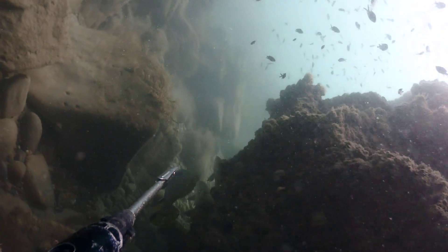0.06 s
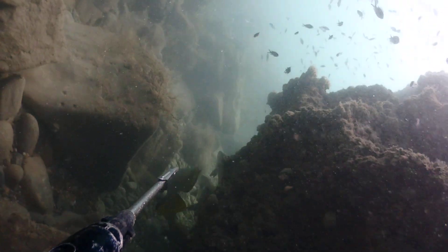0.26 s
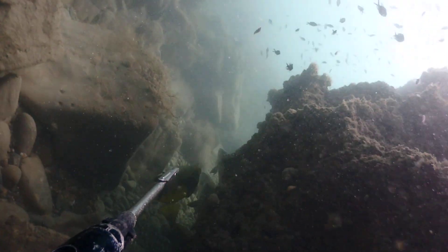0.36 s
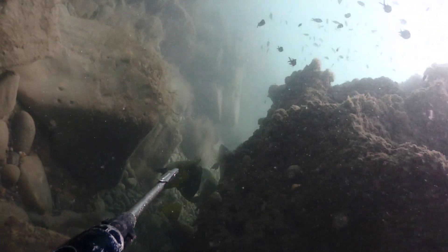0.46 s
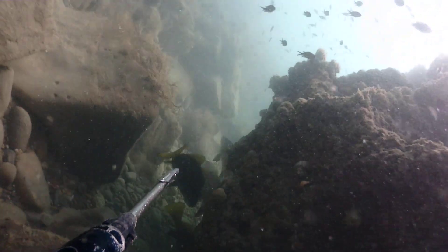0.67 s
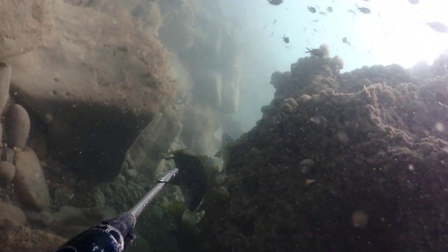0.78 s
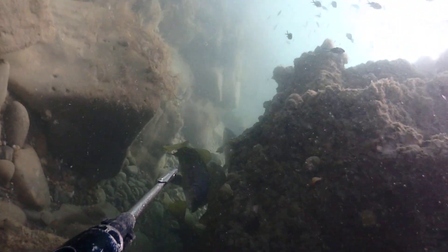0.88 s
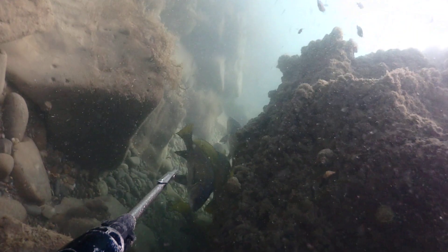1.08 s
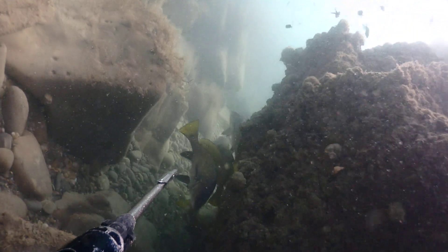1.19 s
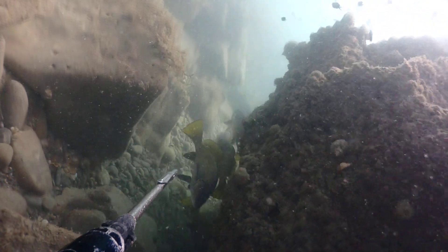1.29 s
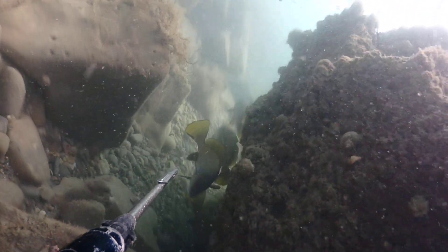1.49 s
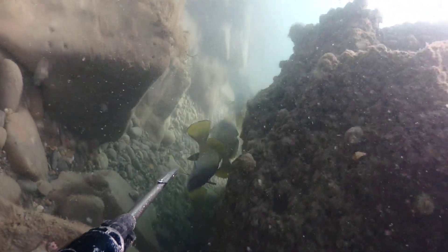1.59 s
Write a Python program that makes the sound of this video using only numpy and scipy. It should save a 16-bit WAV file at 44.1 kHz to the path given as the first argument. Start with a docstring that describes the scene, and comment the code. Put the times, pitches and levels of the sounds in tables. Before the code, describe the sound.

Muffled knocks on a sealed camera case underwater, all short and dry. Snaps at 0.07 s lead to clustered hollow knocks around 0.2 s and a dull bump at 0.33 s. One hard clack hits at 0.57 s, brighter on the left. Bumps resume at 0.82 s; knocks cluster at 1.1-1.3 s, then thin out until 1.65 s. Fine crackle swells and dips over low wash and hiss.

```python
"""Under water among rocks, a camera drifts in a sealed case whose few short modes colour each contact.
Dull bumps, hollow knocks, snaps and thin ticks are short pushes with a rattle that ring those modes.
One hard knock swings the wall of the case; a dense far crackle of random grains and a low wash of
shaped noise lie behind. The right microphone hears the water through a muffled port, and both hiss."""
import sys
import numpy as np
from scipy import signal
from scipy.fft import rfft, irfft
from scipy.io import wavfile

SR = 44100
rng = np.random.default_rng(int(sys.argv[2]) if len(sys.argv) > 2 else 0)


def decibels_to_gain(level_db):
    """Convert a level in decibels to a linear amplitude gain (20 dB per decade)."""
    exponent = np.asarray(level_db, float) / 20
    return 10 ** exponent


def generate_wav(sig):
    """Save sig (samples, or channels by samples) to the path in sys.argv[1] as 16-bit PCM at SR."""
    pcm = np.round(np.clip(np.atleast_2d(sig).T, -1, 1) * 32767).astype(np.int16)
    wavfile.write(sys.argv[1], SR, pcm)


N = 72765  # samples in the scene
TAPS = 4096  # samples in one ring

# Modes of the sealed case: (frequency [Hz], level [dB], t60 [s])
CASE_MODES = [(136.5, -4.5, 0.05), (230, -5, 0.046), (360, -2.5, 0.031), (412.4, 3.5, 0.024),
              (524.5, -3, 0.08), (678, -1.5, 0.034), (736.3, 8.5, 0.025), (950, -11, 0.089),
              (1040, -32, 0.0083), (1372, 5, 0.024), (1610, 4.5, 0.014), (2110, -1.5, 0.024),
              (2978, 3, 0.016), (3597, 5, 0.0067), (4600, -2, 0.015), (5000, -23, 0.023),
              (9500, -29, 0.0058), (12400, -34.5, .003)]


def case_ring(centre_hz, octaves, detune=0.0):
    """Decaying sines of the case, struck once, weighted towards a centre and scaled to peak 1."""
    t = np.arange(TAPS) / SR
    hz, db, t60 = np.transpose(CASE_MODES)[:, :, None]
    # 6 dB weaker at `octaves` away from the centre
    weight_db = db - 6 * (np.log2(hz / centre_hz) / octaves) ** 2
    modes = decibels_to_gain(weight_db - 60 * t / t60) * np.sin(2 * np.pi * hz * (1 + detune) * t)
    build_up_cycles = 1.2  # of the centre frequency
    build_up = np.sin(np.pi / 2 * np.minimum(t * centre_hz / build_up_cycles, 1)) ** 2
    sound = modes.sum(0) * build_up
    return sound / abs(sound).max()


def contacts(rows, octaves, rattle_t60, rattle, gain_db):
    """Each contact is one rounded push and a short noisy rattle, ringing slightly detuned case modes."""
    out = np.zeros(N + 2 * TAPS)
    t = np.arange(1500) / SR  # the rattle stops after 34 ms
    for start_s, db, centre_hz in rows:
        shake = rng.standard_normal(len(t)) * decibels_to_gain(-60 * t / rattle_t60)
        shake = shake / np.linalg.norm(shake)
        tap = t == 0
        rounded = np.hanning(int(0.3 * SR / centre_hz) + 3)  # about 0.3 cycles of the centre
        push = np.convolve(rattle * shake + tap, rounded)
        detune = 0.02 * rng.standard_normal((len(CASE_MODES), 1))
        sound = signal.fftconvolve(push, case_ring(centre_hz, octaves, detune))
        at = round(start_s * SR)
        out[at:at + len(sound)] += decibels_to_gain(db + gain_db) * sound / abs(sound).max()
    return out[:N]


# Dull bumps: (time [s], level before the gain [dB], centre [Hz])
BUMPS = [(.199, -29.5, 400), (.33, -19, 267), (.336, -30.5, 230), (.403, -25, 321), (.415, -36, 266),
         (.477, -39, 300), (.632, -29, 315), (.694, -40, 188), (.823, -20.5, 360), (.829, -26, 310),
         (.873, -32, 336), (.917, -34.5, 273), (.993, -28, 372), (1.146, -21.5, 312), (1.199, -37.5, 232),
         (1.268, -20, 300), (1.276, -28.5, 268), (1.39, -38, 262), (1.501, -39, 141), (1.507, -30.5, 367),
         (1.641, -30, 400)]


def bumps():
    """Low pushes on the case; the faint rattle has a negative t60, so it grows very slightly."""
    return contacts(BUMPS, octaves=0.64, rattle_t60=-5.5, rattle=0.13, gain_db=0.67)


# Hollow knocks: (time [s], level before the gain [dB], centre [Hz])
HOLLOW_KNOCKS = [(.086, -34.5, 547), (.184, -27.5, 740), (.206, -25, 1310), (.22, -21.5, 870),
                 (.231, -36, 1300), (.246, -28, 760), (.345, -22.5, 720), (.404, -26, 680),
                 (.438, -38, 756), (.466, -39, 676), (.689, -32, 780), (.725, -40, 720), (.878, -27.5, 716),
                 (.946, -36, 1100), (.972, -25, 1040), (.992, -33, 750), (1.062, -37, 708),
                 (1.108, -29.5, 760), (1.141, -25, 760), (1.162, -23.5, 740), (1.184, -24.5, 730),
                 (1.204, -31, 705), (1.236, -26, 740), (1.277, -25.5, 710), (1.412, -26, 830),
                 (1.533, -29.5, 763), (1.575, -24.5, 850)]


def knocks():
    """Pushes with a strong rattle that ring a narrow group of middle modes."""
    return contacts(HOLLOW_KNOCKS, octaves=0.4, rattle_t60=0.035, rattle=0.62, gain_db=4.3)


# Small snaps: (time [s], level before the gain [dB], centre [Hz])
SMALL_SNAPS = [(.0688, -22.5, 4300), (.0754, -28, 2970), (.1047, -30, 3200), (.3351, -23.5, 2940),
               (.44, -31, 3800), (.533, -31, 3400), (.6125, -37, 5200), (.6385, -33, 3170),
               (1.018, -31.5, 4950), (1.037, -32.5, 3580), (1.0795, -24.5, 3940), (1.0864, -34, 4600),
               (1.0923, -27, 4000), (1.1683, -37, 3150), (1.5163, -37, 4170), (1.558, -42.5, 4800)]


def snaps():
    """Very short pushes with a rattle that ring a wide group of treble modes."""
    return contacts(SMALL_SNAPS, octaves=0.686, rattle_t60=0.034, rattle=0.6, gain_db=6.1)


# Thin high ticks: (time [s], level before the gain [dB], centre [Hz])
THIN_TICKS = [(0.1098, -38, 9200), (0.2885, -33.5, 10000), (0.6124, -42, 9500), (0.844, -41, 9600),
              (1.0392, -47.5, 12200), (1.309, -47.5, 11500), (1.5578, -38, 8900)]


def ticks():
    """The shortest pushes, with a quick rattle, ring the highest modes."""
    return contacts(THIN_TICKS, octaves=0.48, rattle_t60=0.022, rattle=0.41, gain_db=5.6)


# Modes of the wall where it is struck: (frequency [Hz], left level [dB], right level [dB], t60 [s])
WALL = [(214, -36, -40, .03), (400, -18, -22.5, 0.044), (605, -15.5, -16.5, 0.025), (746, -8, -4, 0.03),
        (1070, -21, -44, 0.048), (1300, -4, -32, .015), (1690, -1.5, -53, 0.006),
        (2250, -12.5, -39, 0.0091), (3020, -12, -57, 0.0089), (4600, -30.5, -46, 0.0028)]
# Way each wall mode swings at first: one sign per mode
FIRST_SWING = [1, 1, 1, 1, -1, 1, -1, 1, -1, 1]


def bang():
    """One hard knock swings the modes of the case wall, at other levels in each microphone."""
    bang_s, rise_cycles = 0.5711, 0.83  # start; build-up in cycles of each mode
    t = np.arange(TAPS) / SR
    out = np.zeros((2, N))
    at = round(bang_s * SR)
    for (hz, left_db, right_db, t60), swing in zip(WALL, FIRST_SWING):
        rise = np.sin(np.pi / 2 * np.minimum(t * hz / rise_cycles, 1)) ** 2
        mode = swing * rise * decibels_to_gain(-60 * t / t60) * np.sin(2 * np.pi * hz * t)
        out[:, at:at + TAPS] += decibels_to_gain(np.array([[left_db], [right_db]])) * mode
    return out


def evened(x):
    """Scales a signal to an rms of 1."""
    return x / np.sqrt(np.mean(x ** 2) + 1e-20)


# Far crackle, one row a band: (rate [grains/s], size spread [dB], rms before the swell [dB])
GRAINS = [(246, 3, -52.5), (300, 2.5, -47.5), (1458, 6, -45)]
# Case modes each band rings: (centre [Hz], width [octaves])
GRAIN_BANDS = [(330, .6), (750, .3), (3100, .5)]
# Swell of the crackle, used about its mean: (time [s], level of lower bands [dB], of top band [dB])
SWELL = [(0.0, -57, -47.5), (0.394, -52, -51.5), (0.642, -61, -59), (0.812, -53, -51),
         (1.074, -51.5, -45.5), (1.216, -48, -48.5), (1.492, -58.5, -51), (1.65, -48, -64.5)]


def crackle():
    """Countless far snaps and gravel grains, a few of them larger, ring the same case modes."""
    swell_s, low_db, high_db = np.transpose(SWELL)
    t = np.arange(N) / SR
    out = np.zeros(N)
    for (rate, spread_db, db), (centre_hz, octaves) in zip(GRAINS, GRAIN_BANDS):
        struck = rng.random(N) < rate / SR
        size = decibels_to_gain(spread_db * np.minimum(rng.exponential(1, N), 3))
        grains = rng.choice([-1, 1], N) * struck * size
        swell_db = high_db if centre_hz > 1500 else low_db
        swell = decibels_to_gain(np.interp(t, swell_s, swell_db - swell_db.mean()))
        sound = case_ring(centre_hz, octaves)
        sound = sound / np.linalg.norm(sound)
        out += decibels_to_gain(db) * signal.oaconvolve(evened(grains) * swell, sound)[:N]
    return out


def shaped_noise(hz, db):
    """Steady noise whose spectrum follows levels drawn over log frequency."""
    bins_hz = np.fft.rfftfreq(N, 1 / SR) + 1  # 1 Hz up, to avoid log of zero
    spectrum = rfft(rng.standard_normal(N))
    return irfft(spectrum * decibels_to_gain(np.interp(np.log(bins_hz), np.log(hz), db)), N)


# Spectrum of the water wash: (frequency [Hz], relative level [dB])
WASH_SPECTRUM = [(35, -54), (60, -7.5), (278, -7.5), (346, 0), (476, -6.5), (752, 3), (1060, -20),
                 (1540, -18.5), (2540, -6.5), (2970, -1), (5190, -17.5), (7000, -88), (9100, -41),
                 (15400, -120)]


def wash():
    """Steady low water noise, at -44 dB rms."""
    hz, db = np.transpose(WASH_SPECTRUM)
    return decibels_to_gain(-44) * evened(shaped_noise(hz, db))


def port(x):
    """Path to the right microphone: a resonance, a dip above it and a treble roll-off."""
    resonance_hz, resonance_q = 440, 2.0
    dip_hz, dip_q = 640, 2.2
    roll_off_hz, gain_db = 1200, -1.5
    w, v = 2 * np.pi * resonance_hz, 2 * np.pi * dip_hz
    dip = [w * w / v / v, w * w / v / dip_q, w * w]
    resonance = [1, w / resonance_q, w * w]
    x = signal.lfilter(*signal.bilinear(dip, resonance, SR), x)
    return decibels_to_gain(gain_db) * signal.lfilter(*signal.butter(2, roll_off_hz, fs=SR), x)


# Microphone hiss: (frequency [Hz], left level [dB], right level [dB]), before the hiss gain
HISS_SPECTRA = [(25, 17, 12), (93, 25, 22.5), (400, 28, 19), (1550, 31, 19), (5200, 15, 7), (6800, 3, -8.5),
                (8700, 4.5, 8), (9300, 10, 6), (14000, 10.5, 11.5), (17000, -6, -2)]


def hiss():
    """Independent steady noise of the two microphones, each with its own spectrum."""
    hz, left_db, right_db = np.transpose(HISS_SPECTRA)
    gain_db = -65.5
    return decibels_to_gain(gain_db) * np.array([shaped_noise(hz, left_db), shaped_noise(hz, right_db)])


def scene():
    """Sound in the water reaches the right microphone through its port; the bang joins on both sides."""
    water = bumps() + knocks() + snaps() + ticks() + crackle() + wash()
    return np.array([water, port(water)]) + bang()


def band_limit(x):
    """A steep low-pass at the top of the band."""
    return signal.sosfilt(signal.butter(12, 16620, fs=SR, output="sos"), x)


def record(dry):
    """A low cut, then microphone hiss, then narrow notches in the treble."""
    low_cut = signal.butter(2, 150, 'high', fs=SR, output='sos')  # Hz
    mix = signal.sosfilt(low_cut, dry) + hiss()
    notch_width_hz = 40
    for notch_hz in [6000, 7000, 8000, 8190, 9000, 10000, 11000]:
        mix = signal.lfilter(*signal.iirnotch(notch_hz, notch_hz / notch_width_hz, SR), mix)
    return band_limit(mix)


dry = scene()
out = record(dry)
generate_wav(out)
```